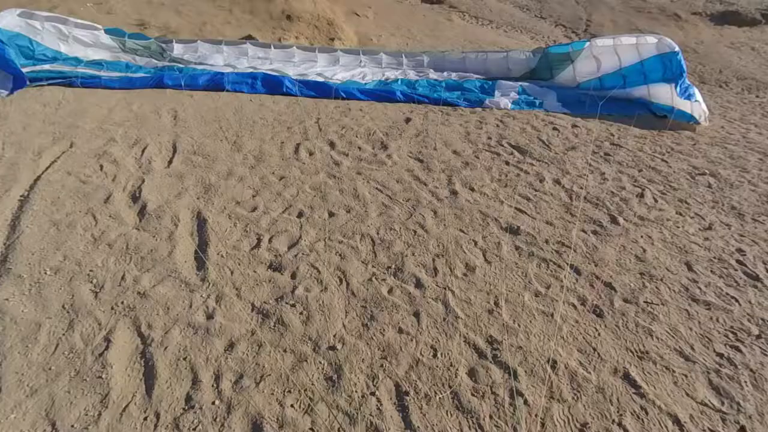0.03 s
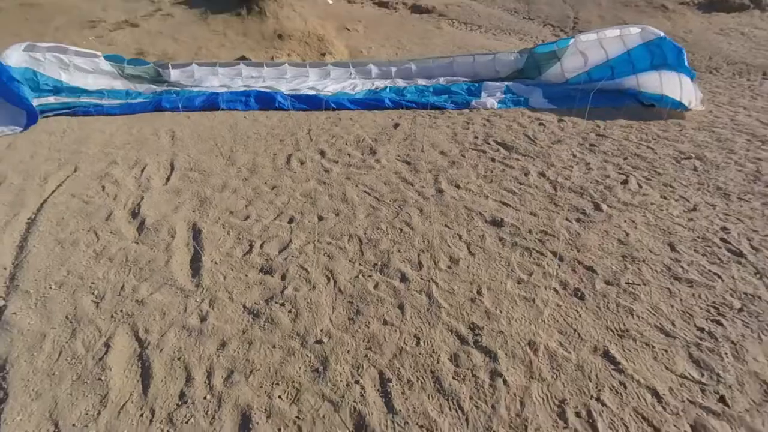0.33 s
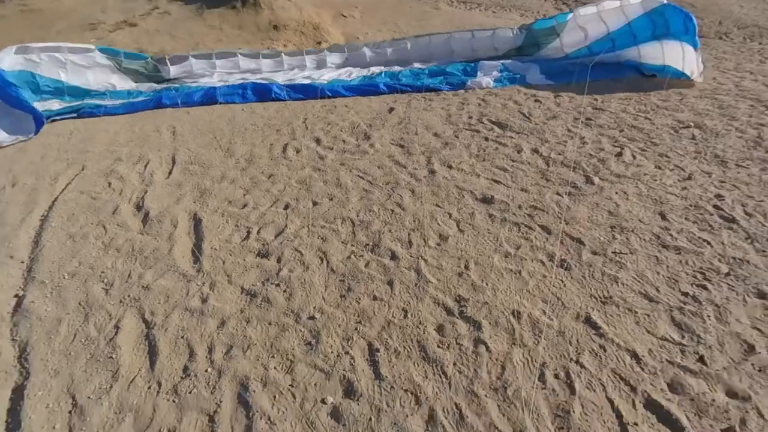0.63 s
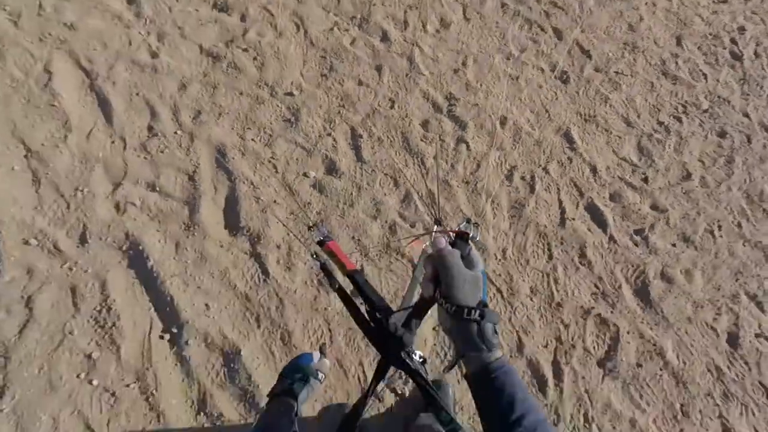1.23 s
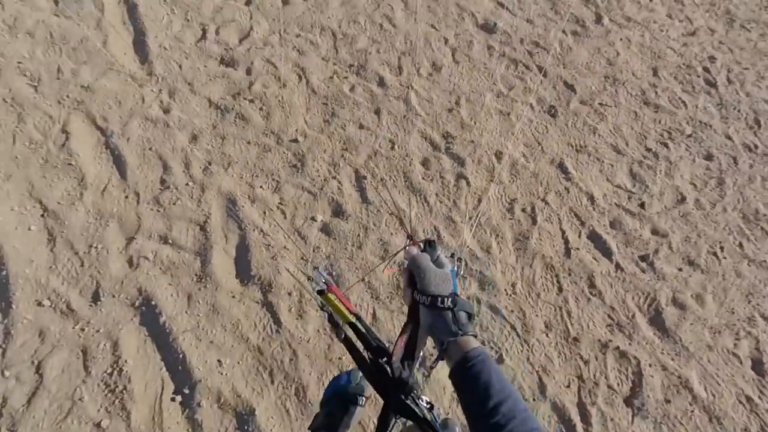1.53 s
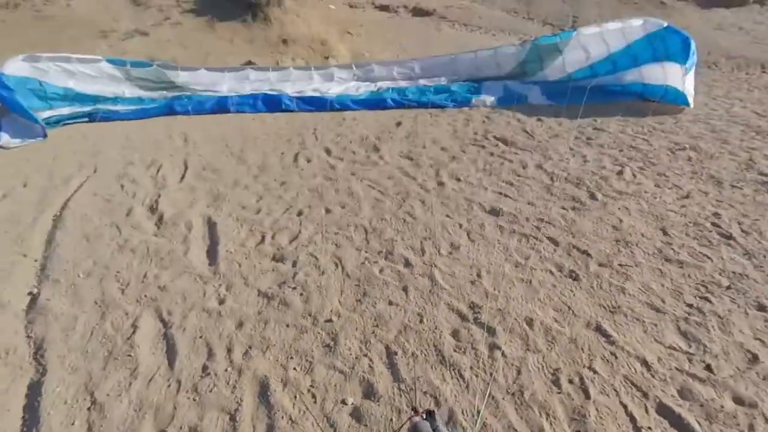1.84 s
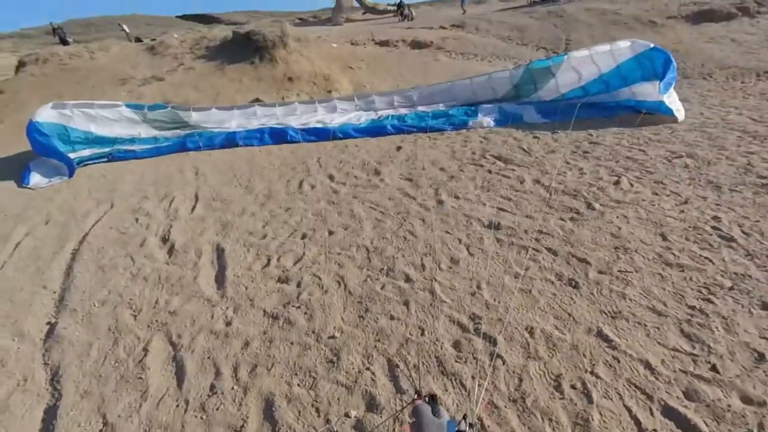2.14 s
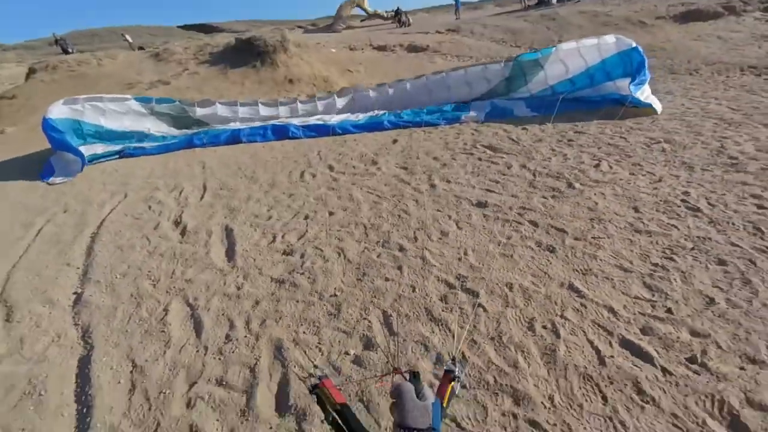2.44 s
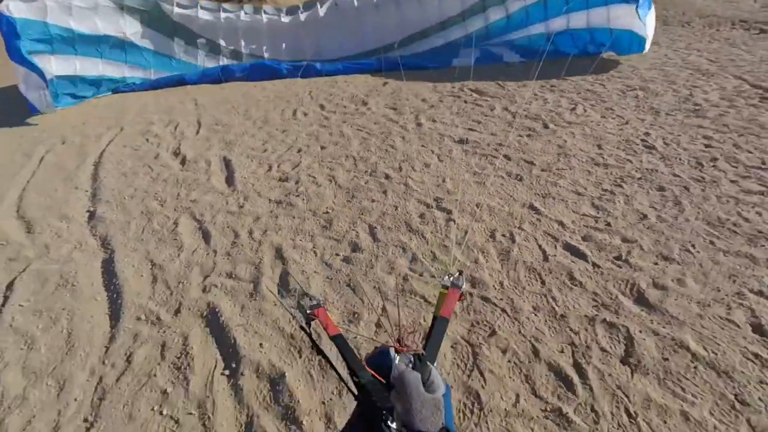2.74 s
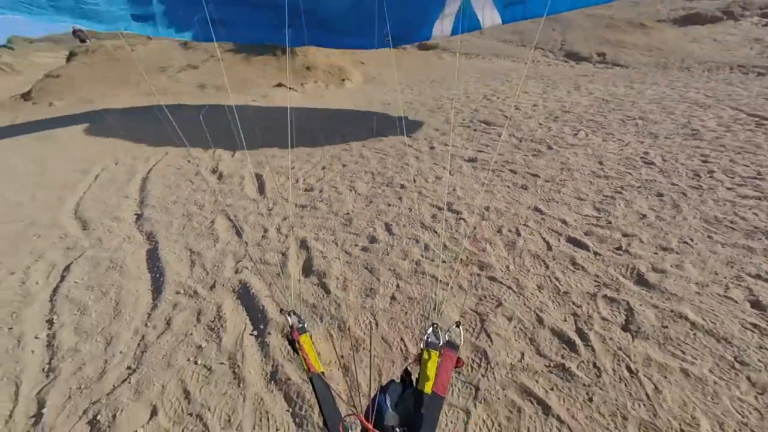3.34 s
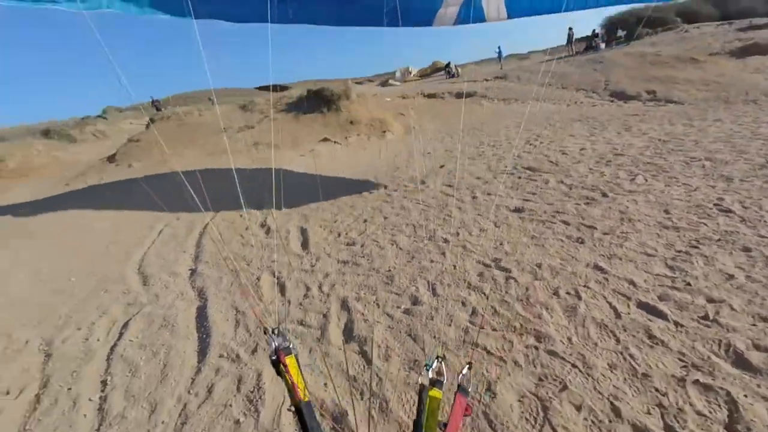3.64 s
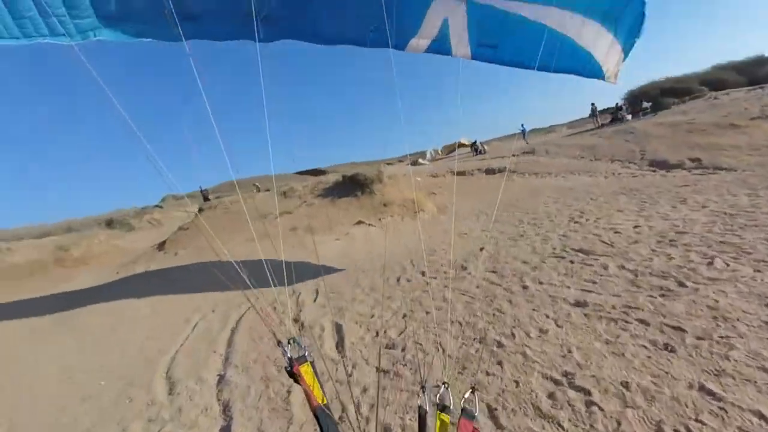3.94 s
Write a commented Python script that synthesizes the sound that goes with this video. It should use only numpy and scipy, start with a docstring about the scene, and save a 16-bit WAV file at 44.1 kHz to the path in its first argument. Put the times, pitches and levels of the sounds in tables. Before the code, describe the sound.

Low, gusty wind buffets a body-worn microphone in the open air. A rush with faint whistles slowly builds, the nearby gear ticks twice, and toward the end a paraglider wing a little way off fills with rustling and flapping.

```python
"""Paraglider lifting off a sandy slope.

Heard from a camera worn by the pilot, out in the wind: eddies rumble, flutter and thump right on the
microphone. An airy rush with faint whistles grows on the right, over a low drone and a faint hiss.
A line's length away the wing fills and rises, its creases rustling and its slack folds flapping.
Close by, the gear ticks twice and the lines give two thin squeaks as they take the load."""
import sys
import numpy as np
from scipy import signal
from scipy.fft import rfft, irfft
from scipy.io import wavfile
from scipy.ndimage import uniform_filter1d

SR = 44100
rng = np.random.default_rng(int(sys.argv[2]) if len(sys.argv) > 2 else 0)


def int16_out(signal):
    """Quantize to a 16-bit WAV file."""
    q = np.round(np.clip(np.atleast_2d(signal).T, -1, 1) * 32767)
    wavfile.write(sys.argv[1], SR, q.astype(np.int16))


N = 176400

# strong single eddies that thump the microphone (time [s], frequency [Hz], relative level [dB])
EDDIES = [(0.285, 115, -7), (0.45, 42, -6), (0.618, 58, -7.5), (.677, 70, -9), (0.758, 175, -3.5),
          (.794, 79, -9.5), (.943, 75, -9), (1.48, 79, -7), (1.518, 100, -9), (1.686, 88, -13),
          (1.805, 190, -16), (2.2, 95, -8.5), (2.336, 135, -10), (2.505, 120, -7.5), (2.611, 115, -7),
          (2.63, 115, -8.5), (2.735, 110, -5.5), (2.795, 79, -9.5), (2.904, 85, -5), (2.988, 79, -8.5),
          (3.02, 55, -6), (3.061, 130, -9.5), (3.189, 110, -10.5), (3.27, 60, -6.5), (3.312, 85, -9.5),
          (3.342, 150, -11.5)]
# swell of the airy rush and the drone (time [s], level [dB])
RUSH_SWELL = [(0, -96), (.6, -57), (.95, -50.5), (1.5, -46.5), (2, -44), (2.5, -42), (3, -41)]
# swell of the cloth sounds as the wing rises (time [s], level [dB])
WING_SWELL = [(0, -66), (2.2, -57.5), (2.6, -50), (2.97, -45.5), (3.08, -41.5), (3.16, -40), (3.22, -45),
              (3.35, -48.5)]


def undb(db):
    """Decibels to gain."""
    return 10 ** (np.asarray(db) / 20)


def unit(x):
    """Scale to rms 1."""
    return x / np.sqrt(np.mean(x ** 2) + 1e-20)


def clock():
    """Time of every sample, in seconds."""
    return np.arange(N) / SR


def curve(table, column=1):
    """One column of a table, joined by straight lines in time."""
    rows = np.array(table, float)
    return np.interp(clock(), rows[:, 0], rows[:, column])


def noise():
    """White noise."""
    return rng.standard_normal(N)


def impulses(per_s):
    """Clicks of either sign at random moments."""
    return (rng.random(N) < per_s / SR) * np.sign(noise())


def gains(spectrum):
    """Gain of every frequency bin from (frequency [Hz], level [dB]) points."""
    rows = np.array(spectrum, float)
    bin_hz = np.arange(N // 2 + 1) * SR / N
    return undb(np.interp(np.log(bin_hz + 1), np.log(rows[:, 0]), rows[:, 1]))


def colour(x, spectrum):
    """Filter x by a spectrum and scale it to rms 1."""
    return unit(irfft(rfft(x) * gains(spectrum), N))


def noisy_tone(hz, width_hz):
    """A narrow band of noise whose centre may move."""
    bin_hz = np.arange(N // 2 + 1) * SR / N
    a, b = (unit(irfft(rfft(noise()) / (1 + (bin_hz / width_hz) ** 2), N)) for _ in range(2))
    phase = 2 * np.pi * np.cumsum(hz * np.ones(N)) / SR
    return a * np.cos(phase) + b * np.sin(phase)


def wander(per_s):
    """Glides between random values, at rms 1."""
    hold = int(SR / per_s)
    return unit(uniform_filter1d(noise()[np.arange(N) // hold], hold))


def bell(at, half_s):
    """A smooth swell and fade around a moment."""
    return np.exp(-.5 * ((clock() - at) / half_s) ** 2)


def burst(at, attack_s, decay_s):
    """A straight rise under an exponential decay."""
    age = clock() - at
    return np.clip(age / attack_s, 0, 1) * np.exp(-np.abs(age) / decay_s)


def stereo(mid, side):
    """Left and right from middle and side."""
    return np.array([mid + side, mid - side])


def even(x, span_s=0.036):
    """Even out the slow chance swells of a noise."""
    span = int(span_s * SR)
    return x / np.sqrt(uniform_filter1d(uniform_filter1d(x ** 2, span), span) + 1e-9)


def wind():
    """Wind on the microphone: large eddies rumble, and small ones flutter on their pressure peaks."""
    # gusts (time [s], relative rumble level [dB], relative flutter level [dB])
    gusts = [(.09, -23, -34.5), (.15, -16, -29.5), (.24, -23.5, -33), (.33, -18, -25.5),
             (.40, -28.5, -35.5), (.47, -22, -29.5), (.56, -26.5, -37.5), (.62, -10, -30.5),
             (.72, -18, -31), (.79, -18.5, -26), (.88, -22.5, -37), (.94, -19.5, -35), (1.04, -25.5, -32),
             (1.08, -38.5, -53), (1.28, -30.5, -40.5), (1.44, -38.5, -48.5), (1.49, -12.5, -22),
             (1.55, -18, -31.5), (1.6, -24.5, -35.5), (1.82, -21, -32), (1.94, -31, -39.5),
             (2, -18.5, -30.5), (2.12, -24, -31), (2.22, -18, -25), (2.34, -25, -29.5), (2.38, -23, -36),
             (2.48, -19.5, -36.5), (2.52, -17.5, -26.5), (2.62, -19.5, -22), (2.78, -18, -26),
             (2.83, -23, -29), (2.91, -15, -23), (3.06, -14, -24), (3.14, -25.5, -29.5), (3.2, -23.5, -27),
             (3.33, -18, -26), (3.42, -24, -36.5), (4, -30, -35.5)]
    # large eddies (frequency [Hz], level [dB])
    rumble_spectrum = [(12, -4), (22, -3), (32, 2.5), (50, -3), (75, -5.5), (110, -6.5), (160, -14),
                       (240, -34), (500, -57), (3000, -120)]
    # small eddies (frequency [Hz], level [dB])
    flutter_spectrum = [(70, -11.5), (130, 2.5), (200, -0.5), (300, -7), (450, -15), (650, -21.5),
                        (950, -34.5), (1500, -44.5), (3000, -67), (14000, -88)]
    rumble_db, flutter_db, swept_share = 2, 3, .55
    rumble = even(colour(noise(), rumble_spectrum))
    peaks = (np.abs(rumble) + 0.43) ** 0.52 * undb(wander(per_s=70))
    flutter = even(colour(noise(), flutter_spectrum) * peaks)
    flutter = unit(flutter * undb(wander(per_s=21)))  # short shoves
    # each strong eddy sweeps aside part of the rumble, and less of the flutter
    remaining = np.prod([1 - swept_share * bell(at, 1 / hz) for at, hz, _ in EDDIES], axis=0)
    rumble *= remaining * undb(curve(gusts) + rumble_db)
    flutter *= np.sqrt(remaining) * undb(curve(gusts, column=2) + flutter_db)
    return rumble + flutter


def buffets():
    """Each strong eddy sucks and then pushes on the diaphragm; the strongest gusts tear into flurries."""
    # short tearing flurries (time [s], decay [s], upper edge [Hz], level [dB])
    flurries = [(0.325, 0.0062, 750, -21), (0.449, 0.013, 690, -29.5), (.595, 0.0098, 513, -22.5),
                (0.671, 0.0077, 700, -28), (0.751, 0.0089, 800, -24), (0.766, 0.0039, 1350, -21),
                (.788, 0.018, 785, -27), (0.929, 0.012, 790, -29.5), (1.497, 0.008, 580, -25),
                (1.539, 0.0042, 520, -23), (1.797, 0.016, 656, -21), (1.814, 0.0048, 790, -20.5),
                (2.229, 0.017, 580, -23.5), (2.318, 0.016, 470, -22.5), (2.497, 0.008, 600, -20),
                (2.615, 0.01, 700, -22.5), (3.055, 0.008, 810, -18.5), (3.096, 0.006, 1090, -20.5),
                (3.326, 0.017, 584, -22)]
    half_cycles, thump_db = 0.38, .5
    t, out = clock(), np.zeros(N)
    for at, hz, db in EDDIES:
        out += undb(db + thump_db) * np.sin(2 * np.pi * hz * (t - at)) * bell(at, half_cycles / hz)
    for at, decay_s, edge_hz, db in flurries:
        spectrum = [(edge_hz / 6, -7), (edge_hz / 2, 0), (edge_hz, -6), (2 * edge_hz, -28), (15000, -75)]
        tearing = even(colour(noise(), spectrum), span_s=0.024)
        out += undb(db) * burst(at, attack_s=0.0032, decay_s=decay_s) * tearing
    return out


def rush():
    """Air rushes ever louder on the right, with a slowly rising whistle and fainter steady ones."""
    # rushing air (frequency [Hz], level [dB])
    air_spectrum = [(200, 14), (450, 2), (850, 3), (1250, 0.5), (1750, 2), (2300, -3.5), (2600, 0),
                    (4000, -3), (5100, -6), (5600, -13), (6600, -11.5), (8000, -16.5), (12700, -21),
                    (14000, -36), (16000, -48)]
    # its lean to the right (frequency [Hz], right over left [dB])
    balance = [(200, 12), (700, 10), (1300, 2), (2300, 4.5), (4400, 6.5), (8000, 1.5), (15000, 4.5)]
    # steady resonances (frequency [Hz], width [Hz], level against the rush [dB])
    resonances = [(1991, 94, -13), (2237, 106, -13)]
    whistle_hz, rise_hz_per_s, whistle_db = 1435, 35, -12
    side_db, tones_right_over_left_db = -9.5, 8.5
    air = stereo(colour(noise(), air_spectrum), undb(side_db) * colour(noise(), air_spectrum))
    lean = np.sqrt(gains(balance))
    air = irfft(rfft(air) * np.array([1 / lean, lean]), N)
    tones = undb(whistle_db) * even(noisy_tone(whistle_hz + rise_hz_per_s * clock(), width_hz=30))
    for hz, width_hz, db in resonances:
        tones += undb(db) * noisy_tone(hz, width_hz)
    pan = undb(tones_right_over_left_db * np.array([[-.5], [.5]]))
    return (air + tones * pan) * undb(curve(RUSH_SWELL) + .5 * wander(per_s=25.24))


def cloth():
    """Thousands of tiny creases snap as the wing stretches."""
    # snapping creases (frequency [Hz], level [dB])
    crease_spectrum = [(400, -22), (1000, 4), (2500, -0.5), (4200, 3), (6300, -0.5), (8000, -8.5),
                       (10000, -18), (12500, -25), (14500, -47)]
    spread_db, side_db = 3.5, -15

    def creases():
        snaps = impulses(per_s=6000)
        strength = undb(spread_db * np.minimum(rng.exponential(size=N), 5))
        return colour(snaps * strength, crease_spectrum)
    rustle = stereo(creases(), undb(side_db) * creases())
    return rustle * undb(curve(WING_SWELL) + 0.45 * wander(per_s=30))


def folds():
    """Slack folds flap at random moments, dull and ragged, as the wing rises."""
    # flapping folds (frequency [Hz], level [dB])
    flap_spectrum = [(80, -24.5), (800, -0.5), (1600, -11), (8000, -43)]
    return colour(impulses(per_s=70), flap_spectrum) * undb(curve(WING_SWELL) - 2)


def gear():
    """Close by: dry ticks, each a snap with a brief scrape, and rising squeaks as the lines take load."""
    # ticks of the gear (time [s], peak of the snap [dB])
    ticks = [(.7030, -24.5), (2.8464, -12)]
    # snap and scrape alike (frequency [Hz], level [dB])
    tick_spectrum = [(200, 19), (900, 16), (2500, -0.5), (5000, 0), (10000, -11), (12500, -24),
                     (15500, -62)]
    # line squeaks (time [s], half length [s], frequency [Hz], glide [Hz/s], width [Hz], level [dB])
    squeaks = [(3.762, 0.018, 10100, 9900, 700, -53.5), (3.84, 0.0094, 10970, 30300, 160, -46.5)]
    scrape_s, scrape_db = 0.0023, -12.5
    t, out = clock(), np.zeros(N)
    for at, db in ticks:
        snap = colour(signal.unit_impulse(N, int(at * SR)), tick_spectrum)
        scrape = burst(at, scrape_s, scrape_s) * colour(noise(), tick_spectrum)
        out += undb(db) * (snap / snap.max() + undb(scrape_db) * scrape)
    for at, half_s, hz, glide, width_hz, db in squeaks:
        pitch_hz = hz + glide * np.clip(t - at, -2 * half_s, 2 * half_s)
        out += undb(db) * bell(at, half_s) * even(noisy_tone(pitch_hz, width_hz))
    return out


def drone():
    """A wide low drone, perhaps a far engine, swells with the rush over a diffuse rumble."""
    # tones of the drone (frequency [Hz], width [Hz], level against the rush [dB])
    partials = [(76.26, 8.2, 11), (302.1, 21, -0.5), (747, 7.3, -12)]
    # rumble in opposite phase left and right (frequency [Hz], level [dB])
    diffuse_spectrum = [(15, 5), (40, 18), (90, 16), (150, -7), (300, -13), (500, -35), (900, -38.5)]
    side_db, diffuse_db = -13, 1.5

    def hum():
        return sum(undb(db) * even(noisy_tone(hz, width_hz)) for hz, width_hz, db in partials)
    mid = hum()
    side = undb(side_db) * hum() + undb(diffuse_db) * colour(noise(), diffuse_spectrum)
    return stereo(mid, side) * undb(curve(RUSH_SWELL))


def hiss():
    """A faint centred hiss that steps down just after the first tick."""
    # background hiss (frequency [Hz], level [dB])
    hiss_spectrum = [(300, 9), (1200, 1.5), (3000, -2.5), (6100, -9.5), (6550, -2.5), (7100, -11.5),
                     (9000, -14.5), (10500, -23.5), (13000, -21), (15000, -56)]
    opening_db, drop_at_s, drop_db = -51, .71, 8
    return colour(noise(), hiss_spectrum) * undb(opening_db - drop_db * (clock() > drop_at_s))


def scene():
    """At the pilot's position: wind on the microphone over the sounds of the wing and a low drone."""
    return wind() + buffets() + rush() + drone() + cloth() + folds() + hiss() + gear()


def record(dry):
    """The body-worn camera: the sound cuts in and out abruptly and loses its highest treble."""
    start_s, fade_s, top_hz = 0.0882, .004, 15600
    t = clock()
    gate = np.clip(np.minimum(t - start_s, t[-1] - t) / fade_s, 0, 1)
    lowpass = signal.ellip(8, .2, 70, top_hz, fs=SR, output="sos")
    return signal.sosfilt(lowpass, dry * gate)


dry = scene()
out = record(dry)
int16_out(out)
```